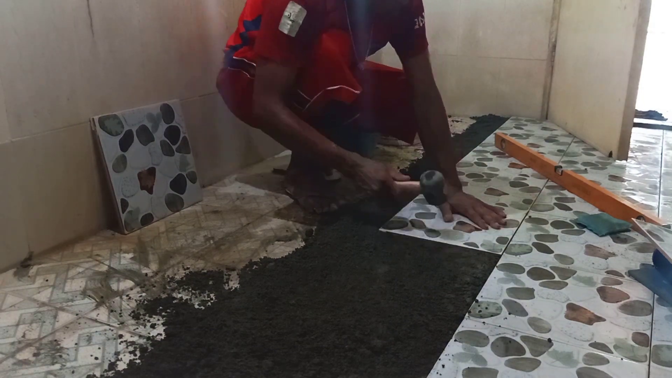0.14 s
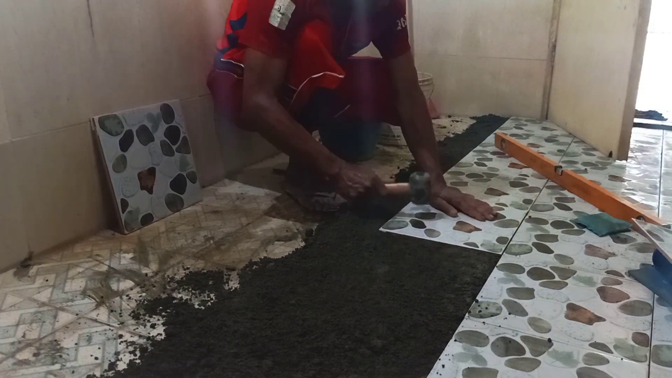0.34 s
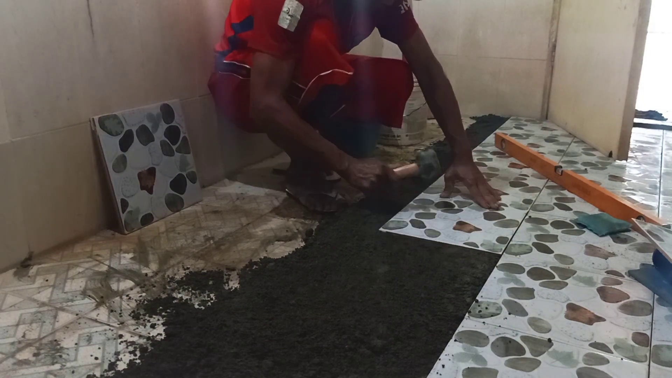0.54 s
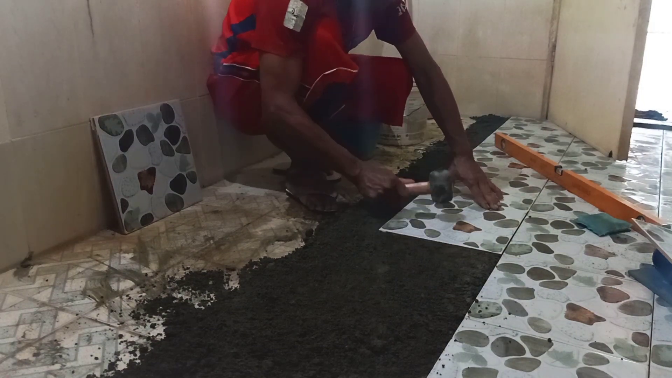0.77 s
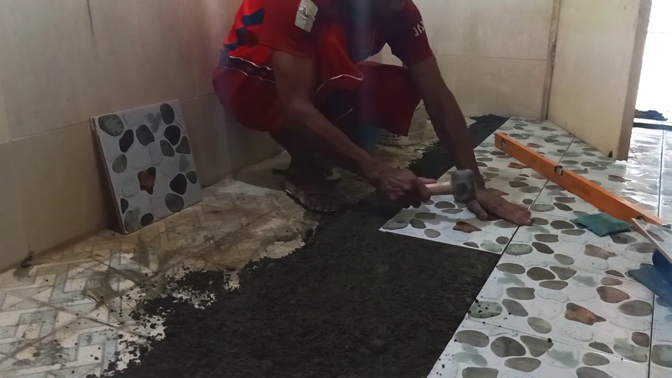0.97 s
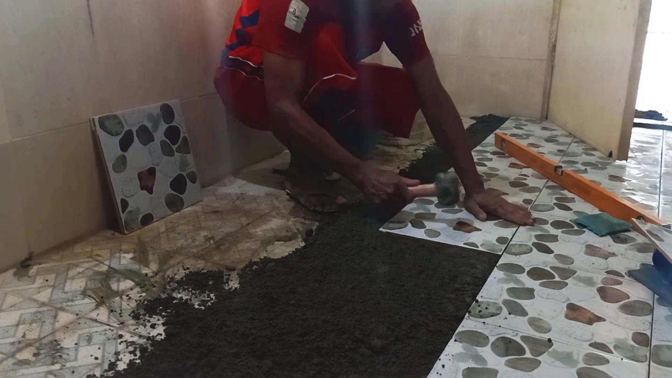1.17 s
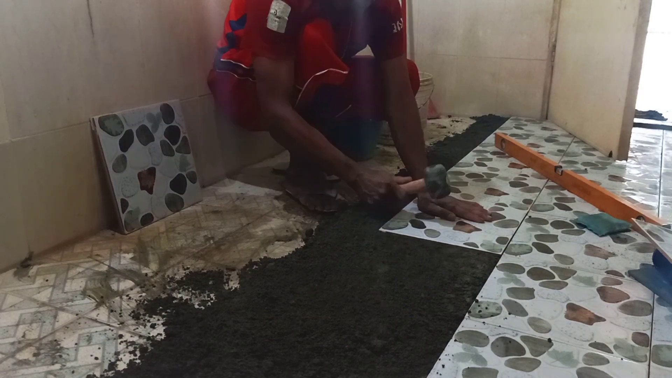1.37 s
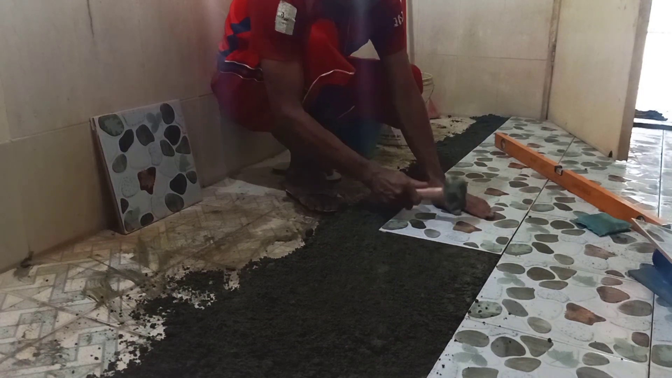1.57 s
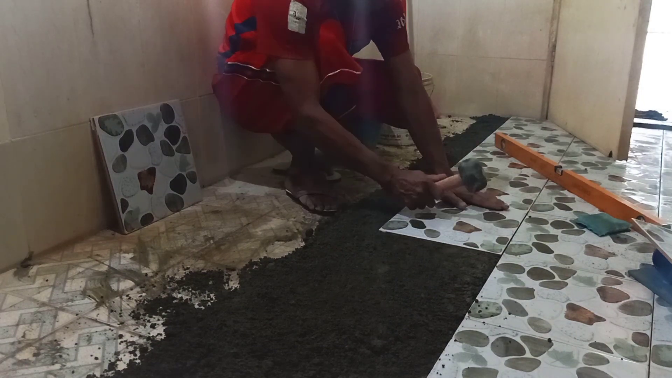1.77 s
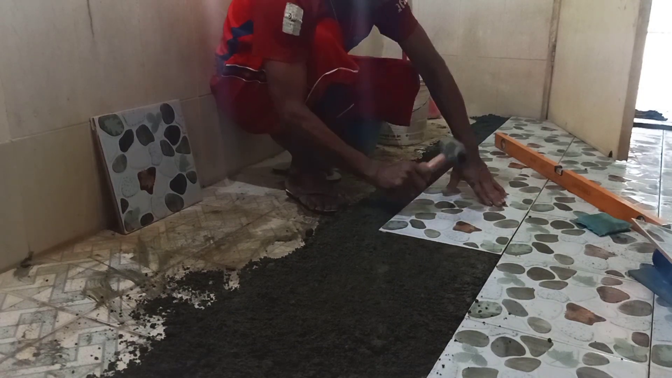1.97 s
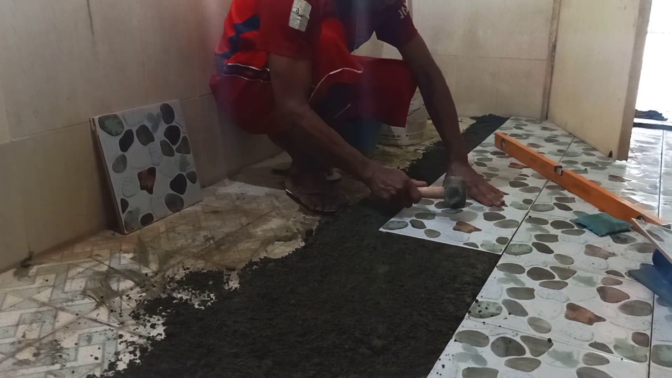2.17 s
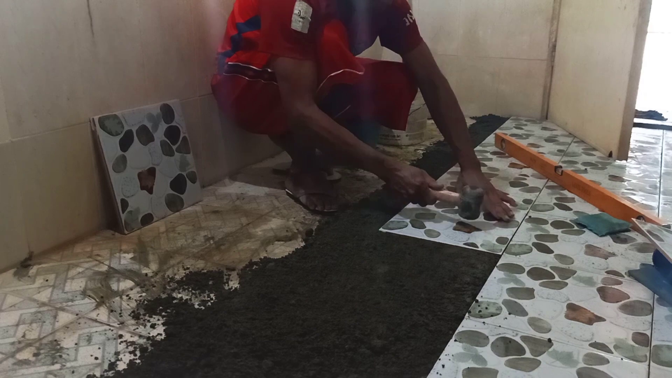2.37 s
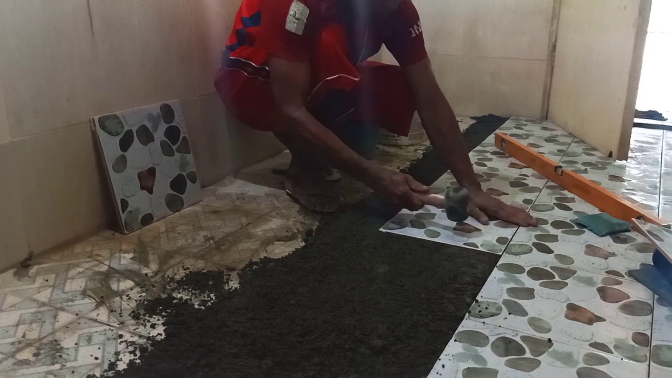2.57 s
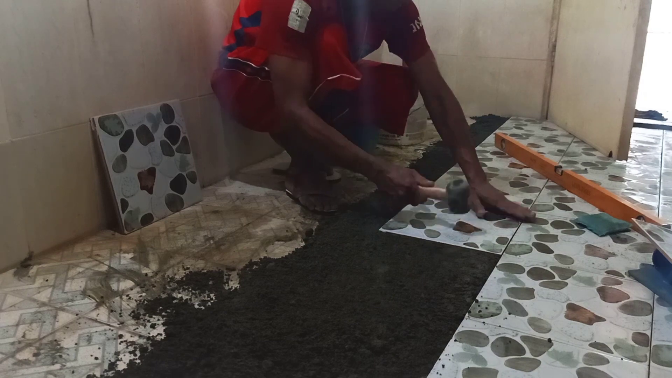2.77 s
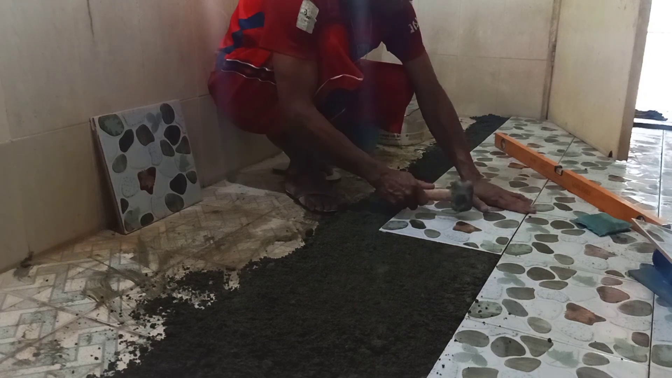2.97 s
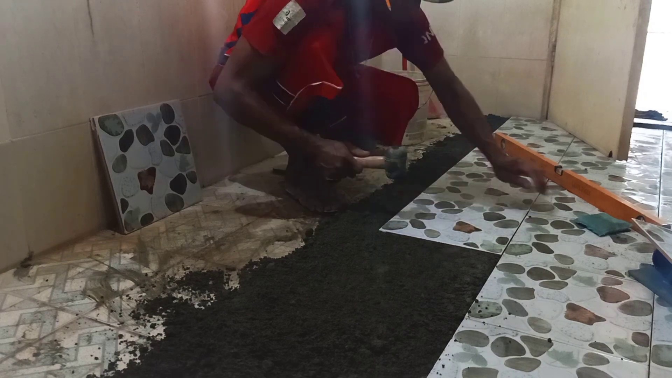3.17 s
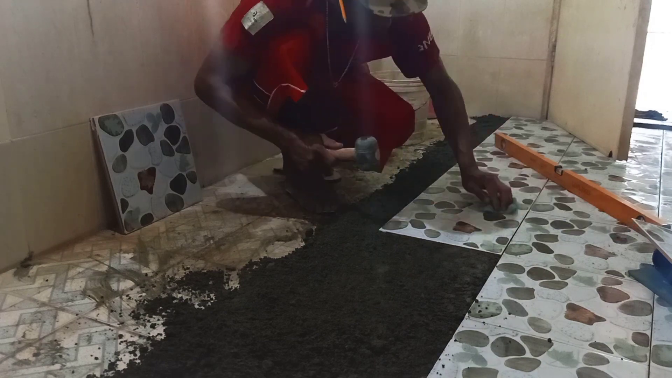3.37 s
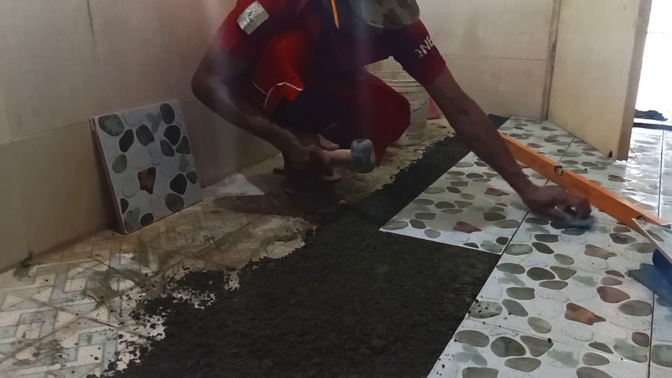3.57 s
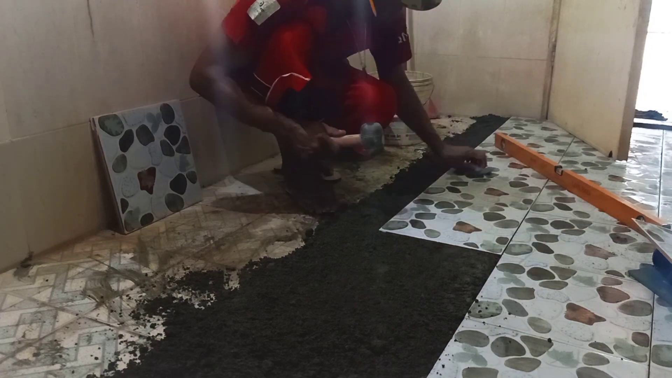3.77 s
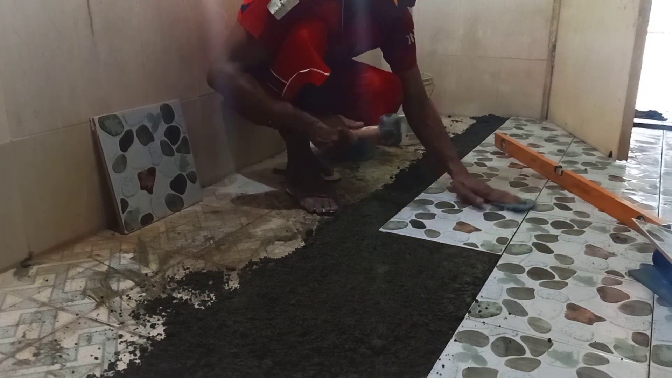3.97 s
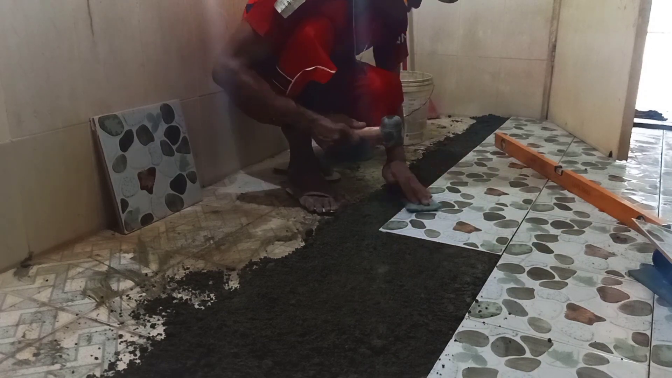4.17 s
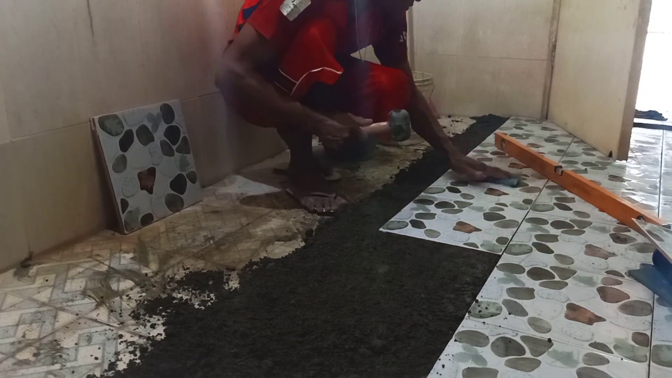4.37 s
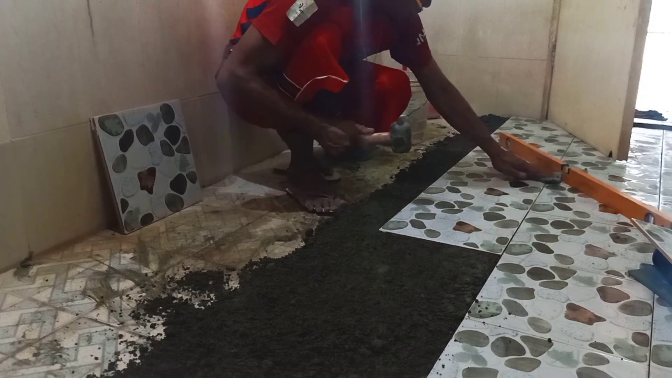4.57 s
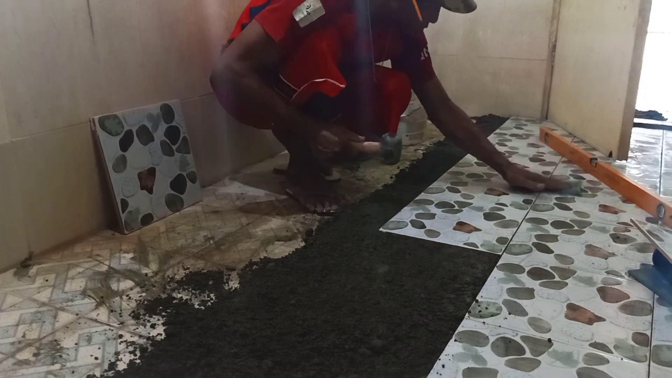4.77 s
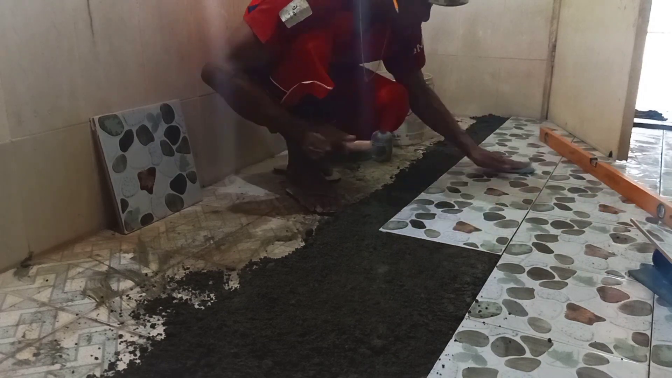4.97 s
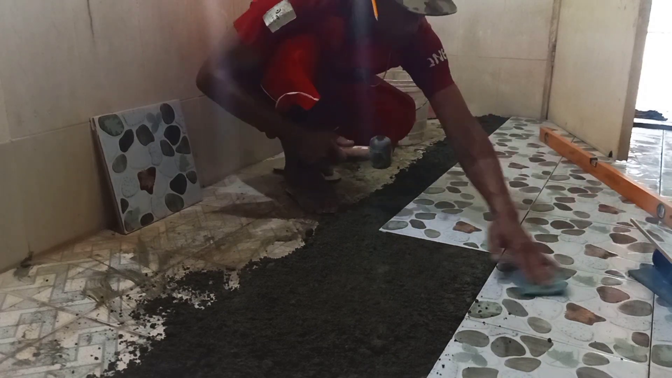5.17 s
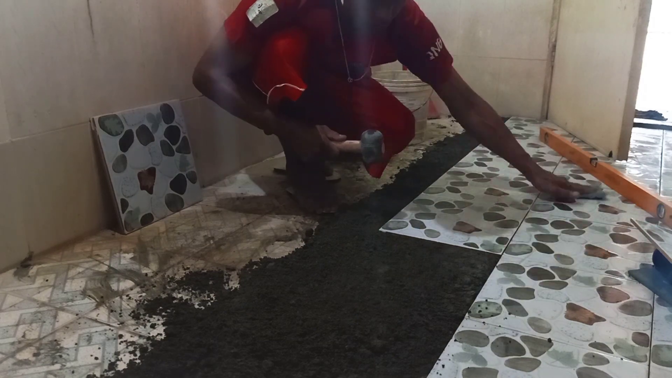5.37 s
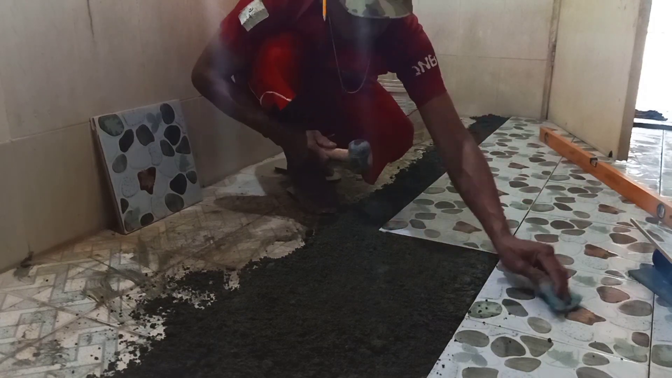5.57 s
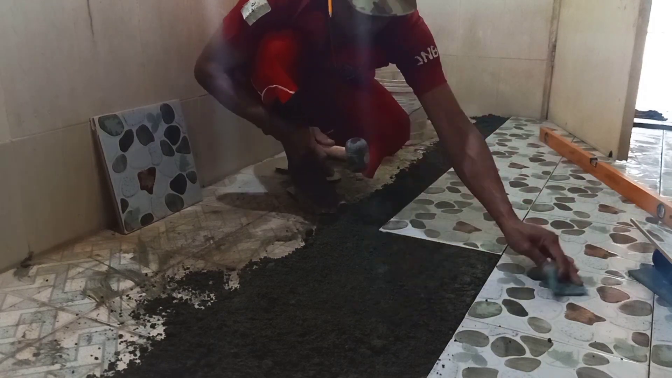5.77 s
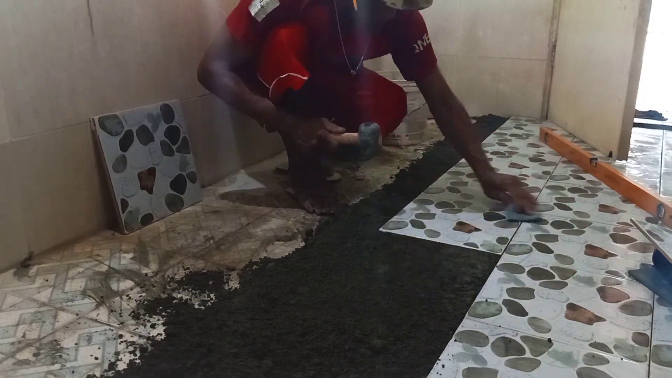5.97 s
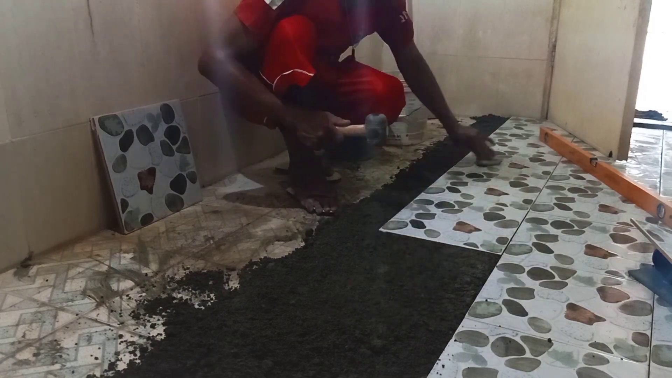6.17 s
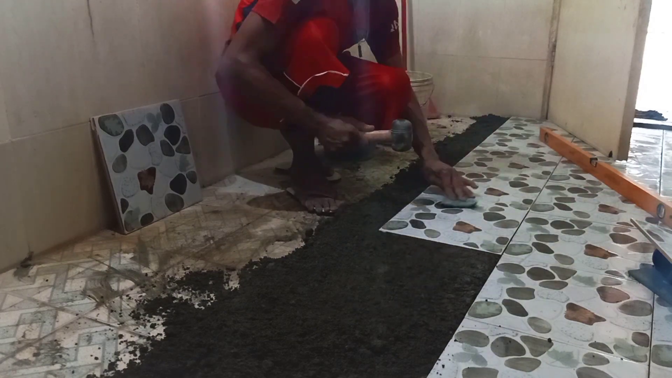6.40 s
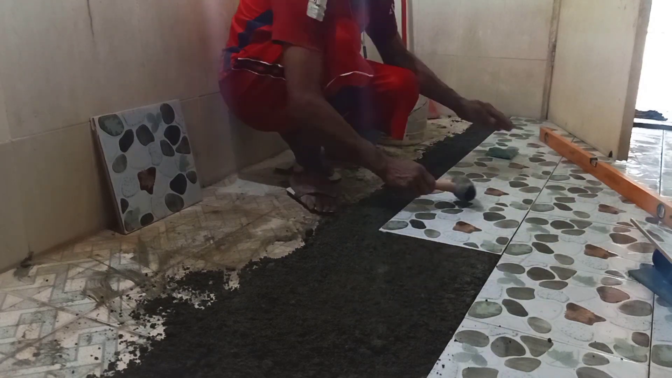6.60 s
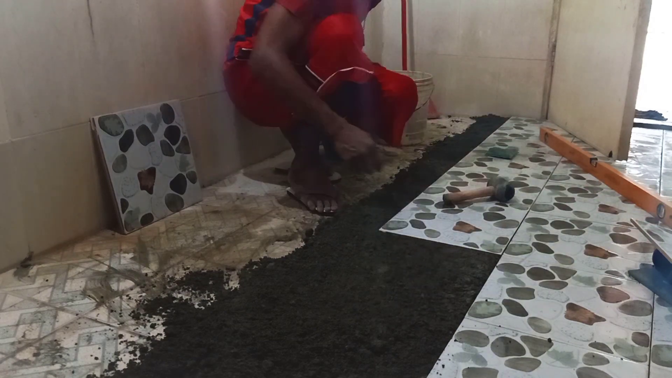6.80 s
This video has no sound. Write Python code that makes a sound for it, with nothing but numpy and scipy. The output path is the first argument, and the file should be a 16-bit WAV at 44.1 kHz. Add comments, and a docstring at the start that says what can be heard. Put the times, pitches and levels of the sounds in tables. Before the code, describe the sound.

In a small bare room, a rubber mallet beats a ceramic tile into wet mortar with fast, dull, slightly gritty thuds, about a dozen a second, for three seconds. The tapping stops and a sponge swishes softly over the tiles. A metal spirit level is shoved aside with a short ringing rasp, then light wiping and clothes rustle. Faint birds chirp outside. Close, slightly muffled microphone.

```python
"""In a small bare room, a rubber mallet beds a ceramic floor tile into fresh mortar: a fast run of dull taps.
Each tap mixes decaying sine tones of the tile with noise for its edge and for crushed sand.
Then a sponge wipes the tiles in strokes of tiny random slips, and clothes and feet rustle as filtered noise.
Amid the wiping, a metal spirit level is shoved aside: friction slips rasp and set its resonances ringing.
Faint falling chirps come in through the open door, over quiet, coloured noise for the air."""
import sys
import numpy as np
from scipy import signal
from scipy.fft import rfft, irfft
from scipy.io import wavfile
from scipy.ndimage import uniform_filter1d, minimum_filter1d

SR = 44100
rng = np.random.default_rng(int(sys.argv[2]) if len(sys.argv) > 2 else 0)


def put_to_file(sound):
    """Save the sound as 16-bit audio at rate SR, in the file named by the first command-line argument."""
    columns = np.atleast_2d(sound).T  # one column per channel
    safe = np.clip(columns, -1, 1)
    whole_steps = np.round(safe * 32767)
    wavfile.write(sys.argv[1], SR, whole_steps.astype(np.int16))


N = 301634   # length in samples

# Mallet taps: start_s, blur (0 = one crisp blow, 1 = a drawn-out burst), strength_db (relative),
# thud_tilt_db (per octave, 125 to 500 Hz), hollow_db (relative), extra_sand_db
MALLET_TAPS = [(0.013, 0.81, -24, 0.5, -8, 2), (0.106, 0.5, -22.5, 2, -7.5, 5.5),
               (0.19, 0.89, -32, -1, -15, 14), (0.368, 0.99, -21, 0.5, -11, 8),
               (0.459, 1, -23.5, 1.5, -18, 5.5), (0.5039, 0.51, -20, 0.5, -13, 3.5),
               (0.636, 0.55, -20, 1, -15.5, 5.5), (0.7217, 0.018, -22, 4, -20, 11.5),
               (0.77, 0.58, -20, -0.5, -15, 4), (0.902, 0.56, -21, -1, -16.5, -6),
               (0.945, 0.67, -23, -1, -8.5, 1.5), (1.108, 0.01, -21.5, -3, -18, 4.5),
               (1.163, 0.91, -23, -0.5, -13.5, -4), (1.205, 0.62, -24.5, -3, -14, -4),
               (1.296, 0.51, -20.5, 1.5, -11.5, -0.5), (1.323, 0.46, -27, 2.5, -10.5, -3),
               (1.385, 0.66, -23, 0.5, -16.5, -2), (1.472, 0.69, -20, -1, -7, 5.5),
               (1.564, 0.5, -22, 0, -11, 0), (1.645, 0, -17.5, 5, -19, 0),
               (1.7115, 0.42, -17.5, 1.5, -17.5, 1), (1.7994, 0.35, -18.5, -1, -18, 4),
               (1.874, 0.68, -22.5, -3.5, -7, 4.5), (1.96, 0.64, -23, -0.5, -9, 5),
               (2.0303, 0.068, -17, 5.5, -16.5, -2.5), (2.1771, 0, -21, 2.5, -13.5, -5),
               (2.243, 0, -15, -2.5, -23, -7.5), (2.309, 0.93, -25.5, -3, -16, -2.5),
               (2.4259, 0.35, -20, 0, -23, -7), (2.493, 0.66, -29, -0.5, -13.5, 16),
               (2.623, 0.53, -27.5, -5.5, -19, -9), (2.673, 0.51, -24.5, 1.5, -13, 6.5),
               (2.6822, 0.29, -23.5, -6, -13.5, -1), (2.751, 0.22, -43, -4, -14.5, -11),
               (2.812, 0.38, -31.5, 1, -16.5, 10.5), (2.884, 0.85, -33, 8, -10.5, -5),
               (3.063, 0.56, -23, -2, -17.5, -10), (3.111, 0.46, -19.5, 1.5, -13, -3),
               (3.183, 0, -35, -5, -20, -3), (6.786, 0.33, -48.5, -6, -21, 10)]
# The tile on its mortar bed, before each spot varies it: pitch_hz, level_db (relative), t60_s (time to fall 60 dB)
TILE_TONES = [(173.4, -16, 0.0434), (190, -8.85, 0.0202), (270, -11.6, 0.0172), (429.3, -23.2, 0.047)]
# The tile's higher bending tones, before each spot varies them: pitch_hz, level_db (relative), t60_s
KNOCK_TONES = [(832, 3, 0.027), (917, -0.5, 0.047), (995, -5, 0.053), (1153, -6, 0.016)]
# Hollow ring over a gap in the mortar, before each spot varies it: pitch_hz, level_db (relative), t60_s
HOLLOW_TONES = [(538, -0.5, 0.042), (620, -2.5, 0.05), (710, -4, 0.035)]
# Colour of the tile edge against its neighbour: frequency_hz, level_db (per Hz, relative)
EDGE_COLOUR = [(600, -15.5), (1100, 6), (1800, 0), (2600, -4), (3400, -14.5), (5000, -55.5)]
# Colour of sand crushed under the tile: frequency_hz, level_db (per Hz, relative)
SAND_COLOUR = [(2200, -19), (3400, -3), (4400, -0.5), (5700, 6), (6600, -7.5), (8000, -17.5),
               (10500, -24.5), (12000, -31)]
# A blow harder than usual is brighter: extra dB of knock and clack per dB of strength; sand adds clack too
USUAL_TAP_DB, KNOCK_GROWTH, CLACK_GROWTH, CLACK_PER_SAND = -24, 0.42, 0.45, 0.48
WALL_ECHO_S, WALL_ECHO_DB = .0087, -6.5


def mallet(thud_db, knock_db, clack_db, grit_db, room_db):
    """Each tap is a thud of the bedded tile, a higher knock, a hollow ring, an edge clack and a crunch of sand."""
    t, out = np.arange(SR // 3) / SR, np.zeros(N)
    span = np.sqrt(.043 * SR)   # spreads unit energy over a 43 ms tap body
    for start_s, blur, strength, tilt, hollow, sand in MALLET_TAPS:
        harder = strength - USUAL_TAP_DB
        thud = colour(tile_ring(t, TILE_TONES, contact_hz=426), [(125, 0), (500, 2 * tilt)])
        # the near wall throws the thud straight back
        wall_echo = np.interp(t - WALL_ECHO_S, t, thud, left=0)
        thud = energy_one(thud + from_db(WALL_ECHO_DB) * wall_echo)
        knock = tile_ring(t, KNOCK_TONES, contact_hz=1301)
        hollow_ring = tile_ring(t, HOLLOW_TONES, contact_hz=900)
        clack = colour(crunch(t, blur, crack_t60=0.02, settle_db=-14), EDGE_COLOUR)
        grit = colour(crunch(t, blur, crack_t60=0.014, settle_db=-15), SAND_COLOUR)

        tap = from_db(thud_db) * blurred(t, thud, blur)
        tap += from_db(knock_db + KNOCK_GROWTH * harder) * blurred(t, knock, blur)
        tap += from_db(hollow) * blurred(t, hollow_ring, blur)
        tap += from_db(clack_db + CLACK_GROWTH * harder + CLACK_PER_SAND * sand) * clack
        tap += from_db(grit_db + sand) * grit
        # every tap has its own echoes
        add(out, start_s, span * from_db(strength) * in_room(tap, room_db))
    return out


def tile_ring(t, modes, contact_hz):
    """The bedded tile rings after one blow; each spot has a slightly different pitch and mix."""
    hz, db, t60 = np.transpose(modes)[:, :, None]
    hz = hz * (1 + .04 * rng.standard_normal())
    db = db + .6 * rng.standard_normal(db.shape)
    signs = -(-1) ** np.arange(len(modes))[:, None]   # neighbouring tones start in opposite directions
    ring = np.sum(signs * from_db(db - 60 * t / t60) * np.sin(2 * np.pi * hz * t), axis=0)
    # so small a plate radiates little bass, and the soft rubber head leaves the treble weak
    band = signal.butter(2, [105, contact_hz], "band", fs=SR, output="sos")
    return energy_one(signal.sosfilt(band, ring))


def noise_burst(t, length_s, after_db, size=2048):
    """An even burst of noise, about 45 ms long, drops to a weaker one; unit energy."""
    pieces = []
    for _ in range(len(t) // size + 1):
        random_phase = 2 * np.pi * rng.random(size // 2 + 1)
        pieces.append(irfft(np.exp(1j * random_phase)))   # every frequency equally strong
    after = from_db(after_db)
    fade = np.interp(t / length_s, [0, .04, .92, 1.1, 1.9, 2.2], [.5, 1, 1, after, after, 0])
    return energy_one(np.concatenate(pieces)[:len(t)] * fade)


def blurred(t, ring, blur):
    """Cross-fade from one crisp ring to the same ring drawn out by a noise burst; unit energy."""
    burst = noise_burst(t, length_s=0.0426, after_db=-16.5)
    drawn_out = energy_one(signal.fftconvolve(burst, ring)[:len(t)])
    return energy_one((1 - blur) ** 2 * ring + blur ** 2 * drawn_out)


def crunch(t, blur, crack_t60, settle_db):
    """A sharp crack with sand settling after it cross-fades to a drawn-out noise burst; unit energy."""
    fade = from_db(-60 * t / crack_t60) + from_db(settle_db - 60 * t / 0.3)
    crack = energy_one(rng.standard_normal(len(t)) * fade)
    burst = noise_burst(t, length_s=0.04, after_db=-25.5)
    return energy_one((1 - blur) * crack + blur * burst)


def low_pulse(pulse_db, length_s):
    """A faint, smooth low pulse under each tap."""
    out, pulse = np.zeros(N), np.hanning(int(length_s * SR))
    for start_s, _, strength, *_ in MALLET_TAPS:
        add(out, start_s, from_db(strength + pulse_db) * pulse)
    return out


# Friction as the level slides over the tiles: time_s, level_db (relative)
SLIDE_LEVEL = [(4.65, -62.5), (4.694, -50.5), (4.706, -31), (4.794, -34), (4.81, -29), (4.829, -31),
               (4.836, -38), (4.872, -37.5), (4.885, -57), (4.92, -52), (4.958, -71), (4.98, -80)]
# Its low groan: time_s, level_db
GROAN_LEVEL = [(4.703, -59), (4.712, -40.5), (4.735, -48), (4.8, -47.5), (4.865, -43), (4.9, -49),
               (4.915, -63)]
# Resonances of the metal bar: pitch_hz, width_hz, level_db (relative)
BAR_TONES = [(343, 18, 15), (1140, 50, -1), (1130, 43, -4), (1550, 16, 0), (1590, 16, -16), (1735, 18, 8),
             (1720, 28, 5), (2205, 36, 4), (2400, 25, 2), (4830, 16, -1), (5587, 22, -8), (8500, 120, -8)]
# Colour of its rasp: frequency_hz, level_db (per Hz, relative)
RASP_COLOUR = [(40, -29), (100, -1), (200, 2.5), (400, 5), (650, 2), (1100, 7), (1800, 8.5), (2500, 7),
               (3400, -6.5), (4500, 2.5), (5600, 10.5), (7300, -0.5), (8800, -0.5), (11000, -10),
               (12000, -30)]
SHIFT_DB, SHIFTS_PER_S = 4.5, 40   # how far and how fast each resonance swells and sinks


def spirit_level(ring_db, rasp_db, groan_hz, groan_q):
    """Stick-slip on gritty tile rasps and rings the hollow bar; resonances come and go as the contact shifts."""
    friction = slips(per_s=3200, spread_db=1.5) * gains_in_time(SLIDE_LEVEL)[0]
    t = np.arange(SR // 4) / SR
    modes = []
    for hz, width, db in BAR_TONES:
        decay = np.exp(-np.pi * width * t)
        modes.append(from_db(db) * width * decay * np.sin(2 * np.pi * hz * t))
    modes = np.array(modes)
    bar = np.zeros(N)
    for mode in modes / np.linalg.norm(modes):
        shifting = friction * from_db(SHIFT_DB * drift(rate=SHIFTS_PER_S))
        bar += signal.oaconvolve(shifting, mode)[:N]

    # the same resonance twice gives the groan a more definite pitch
    resonance = signal.iirpeak(groan_hz, groan_q, fs=SR)
    judder = signal.lfilter(*resonance, slips(per_s=600, spread_db=-1.5))
    groan = gains_in_time(GROAN_LEVEL)[0] * rms_one(signal.lfilter(*resonance, judder))
    return from_db(ring_db) * bar + from_db(rasp_db) * colour(friction, RASP_COLOUR) + groan


# Sponge strokes: start_s, length_s, swish_db (relative), wet_glaze_hiss_db (relative)
SPONGE_STROKES = [(3.19, 0.036, -67, -70), (3.28, 0.048, -63.5, -82), (3.43, 0.098, -64, -69.5),
                  (3.68, 0.074, -67.5, -66.5), (3.89, 0.028, -53, -66), (4.12, 0.071, -59.5, -70),
                  (4.57, 0.089, -68, -79), (5.05, 0.049, -77, -75), (5.17, 0.21, -65, -73),
                  (5.48, 0.078, -61.5, -73.5), (5.71, 0.052, -51, -65), (5.91, 0.11, -53, -90),
                  (6.12, 0.13, -61.5, -86), (6.28, 0.15, -55, -72.5), (6.46, 0.26, -59.5, -84),
                  (6.76, 0.045, -55, -75)]
# Clothes and feet shifting: start_s, length_s, level_db (relative)
BODY_SHIFTS = [(5.74, 0.044, -59), (5.93, 0.11, -59), (6.1, 0.87, -56), (6.5, 0.076, -55),
               (6.775, .06, -53)]
# Sand grains cracking on the glaze: start_s, level_db (relative)
SAND_CRACKS = [(2.23, -43), (3.905, -59), (5.2483, -42.5), (5.7194, -41), (6.39, -41)]
# Colour of the sponge: frequency_hz, level_db (per Hz, relative)
SPONGE_COLOUR = [(700, -48.5), (1300, 0.5), (2100, 8.5), (3600, -2.5), (5600, 1.5), (7000, -11.5),
                 (10000, -37.5), (12000, -31.5)]
# Colour of the clothes: frequency_hz, level_db (per Hz, relative)
CLOTHES_COLOUR = [(60, -1), (140, 12.5), (320, 13), (600, 8), (1200, 6), (2500, -66)]


def wiping(swish_db, hiss_db, hiss_hz, rustle_db, grain_db, grain_t60):
    """The sponge swishes over the glaze and catches sand; clothes and feet rustle lower down."""
    pressure, wetness = strokes(SPONGE_STROKES)
    rub = from_db(swish_db + 2 * drift(rate=30)) * pressure * slips(per_s=2000, spread_db=1.5)
    t = np.arange(SR // 20) / SR
    for start_s, db in SAND_CRACKS:
        fade = from_db(db + grain_db - 60 * t / grain_t60)
        add(rub, start_s, fade * rng.standard_normal(len(t)))

    glaze = signal.butter(2, [hiss_hz, 1.6 * hiss_hz], "band", fs=SR, output="sos")
    wet_slips = rms_one(signal.sosfilt(glaze, slips(per_s=2700, spread_db=2.0)))
    hiss = from_db(hiss_db) * wetness * wet_slips

    movement = strokes(BODY_SHIFTS)[0]
    rustle = from_db(rustle_db + 2 * drift(rate=28)) * movement * rng.standard_normal(N)
    return colour(rub, SPONGE_COLOUR) + hiss + colour(rustle, CLOTHES_COLOUR)


SWELL_S, FADE_S = 0.026, 0.059   # every stroke of the hand or shift of the body


def strokes(rows):
    """Rows of (start_s, length_s, level_db, ..) become gain curves: each stroke swells, holds and fades."""
    t = np.arange(N) / SR
    shapes = []
    for start_s, length, *_ in rows:
        swell = np.interp(t - start_s, [0, SWELL_S], [0, 1])
        fade = np.interp(t - start_s - length, [0, FADE_S], [1, 0])
        shapes.append(swell * fade)
    return from_db(np.array(rows)[:, 2:].T) @ np.array(shapes)


# Faint low tones of rubbing: start_s, length_s, first_pitch_hz, last_pitch_hz, level_db (before wavering)
RUB_TONES = [(5.43, 0.14, 660, 571, -61.5), (5.95, 0.11, 309, 296, -58), (6.02, 0.12, 506, 442, -60),
             (6.36, 0.096, 203, 235, -55)]


def rubs(waver):
    """Now and then a rub settles into a faint low tone, unsteady in pitch and level."""
    out = np.zeros(N)
    for start_s, length, from_hz, to_hz, db in RUB_TONES:
        u = np.linspace(0, 1, int(length * SR))
        hz = (from_hz + (to_hz - from_hz) * u) * (1 + waver * drift(rate=143)[:len(u)])
        level = from_db(db + 2 * drift(rate=63)[:len(u)]) * np.sin(np.pi * u)
        add(out, start_s, level * np.sin(2 * np.pi * np.cumsum(hz) / SR))
    return out


# Birds outside: start_s, middle_pitch_hz (before wavering), level_db (before smearing)
BIRD_CHIRPS = [(0.28, 5330, -54), (1.02, 5460, -78), (1.13, 5070, -61), (1.239, 5180, -68),
               (1.6, 4920, -63.5), (2.04, 5140, -63), (2.13, 4910, -65), (2.279, 5400, -66),
               (2.39, 5670, -63), (2.781, 5410, -60), (2.909, 5180, -55.5), (3.01, 5550, -58.5),
               (3.119, 5380, -63), (3.25, 5780, -59.5), (3.361, 5780, -58), (3.38, 5200, -61),
               (3.5, 5240, -56), (3.631, 5000, -66), (3.76, 5400, -57.5), (3.811, 4800, -60),
               (3.89, 5670, -62), (4.18, 5020, -59), (4.3, 5550, -62.5), (4.42, 5570, -56),
               (4.569, 5600, -62.5), (4.91, 5600, -55.5), (5.04, 5270, -57), (5.17, 5400, -58),
               (5.32, 5490, -56), (5.45, 5780, -53), (5.57, 5620, -54.5), (5.84, 5600, -58),
               (6.06, 5480, -56), (6.281, 5780, -56), (6.48, 5540, -58.5), (6.59, 5600, -59.5),
               (6.63, 5140, -60), (6.739, 5630, -56)]


def chirps(fall_hz, length_s, waver_hz):
    """Small far birds: short, hoarse, falling chirps, smeared by the walls on their way in."""
    out, u = np.zeros(N), np.linspace(0, 1, int(length_s * SR))
    for start_s, pitch_hz, db in BIRD_CHIRPS:
        waver = np.interp(u, np.linspace(0, 1, 80), rng.standard_normal(80))
        hz = pitch_hz + fall_hz * (.5 - u) + waver_hz * waver
        add(out, start_s, from_db(db) * np.sin(np.pi * u) * np.sin(2 * np.pi * np.cumsum(hz) / SR))
    t = np.arange(SR // 5) / SR
    smear = energy_one(rng.standard_normal(len(t)) * from_db(-60 * t / 0.098))
    return signal.fftconvolve(out, smear)[:N]


# Colour of still air and far hiss from outdoors: frequency_hz, level_db (per Hz, relative)
AIR_COLOUR = [(25, -19), (50, -15), (120, -3.5), (210, -16), (300, -11), (500, -17), (1400, -25),
              (2150, -21), (3500, -27), (5550, -19), (6800, -36.5), (10500, -44.5), (12000, -58.5)]


def quiet_air(level_db):
    """Steady random noise, coloured like still air and far outdoor hiss."""
    return from_db(level_db) * colour(rng.standard_normal(N), AIR_COLOUR)


ROOM_T60_S, BASS_T60_S, BASS_HZ = .31, .45, 260
BOOM_HZ, BOOM_DB = 430, -10


def in_room(x, room_db):
    """Add the dense echoes of bare walls; the bass lasts longest and the low middle booms."""
    t = np.arange(SR // 3) / SR
    echoes = rng.standard_normal(len(t))
    bass = signal.sosfiltfilt(signal.butter(2, BASS_HZ, fs=SR, output="sos"), echoes)
    tail = bass * from_db(-60 * t / BASS_T60_S) + (echoes - bass) * from_db(-60 * t / ROOM_T60_S)
    tail = energy_one(tail * np.clip(t / WALL_ECHO_S - 1, 0, 1))   # silent until the wall echo, then fades in
    tail = tail + from_db(BOOM_DB) * signal.lfilter(*signal.iirpeak(BOOM_HZ, 1, fs=SR), tail)
    return x + from_db(room_db) * signal.fftconvolve(x, tail)[:len(x)]


def slips(per_s, spread_db):
    """Random tiny slips of uneven size; rms 1."""
    sizes = from_db(spread_db * np.minimum(rng.exponential(1, N), 4))
    signed_sizes = sizes * rng.choice([-1, 1], N)
    return rms_one(signed_sizes * (rng.random(N) < per_s / SR))


def drift(rate):
    """A random wander through `rate` new values a second; rms 1."""
    knots = rng.standard_normal(2048)
    return rms_one(np.interp(np.arange(N) / SR * rate, np.arange(len(knots)), knots))


def colour(x, spectrum, size=2048):
    """Filter with the given spectrum, unit energy and no sound ahead of its cause (minimum phase)."""
    hz = np.arange(size // 2 + 1) * SR / size
    cepstrum = irfft(np.log(from_db(at_hz(spectrum, hz))))
    # folding the second half onto the first puts the response as early as possible
    cepstrum[1:size // 2] *= 2
    cepstrum[size // 2 + 1:] = 0
    response = energy_one(irfft(np.exp(rfft(cepstrum))))
    return signal.fftconvolve(x, response)[:len(x)]


def at_hz(points, hz):
    """Read a table on a log-frequency axis."""
    f, value = np.transpose(points)
    return np.interp(np.log(np.maximum(hz, 1)), np.log(f), value)


def gains_in_time(rows):
    """Rows of (time_s, level_db, ..) become gain curves, silent outside their span."""
    time_s, *columns = np.transpose(rows)
    t = np.arange(N) / SR
    return [from_db(np.interp(t, time_s, db, left=-np.inf, right=-np.inf)) for db in columns]


def add(out, start_s, sound):
    """Mix a sound in at its start time."""
    at = max(round(start_s * SR), 0)
    out[at:at + len(sound)] += sound[:max(N - at, 0)]


def from_db(db):
    """Decibels to gain."""
    return 10 ** (np.asarray(db) / 20)


def rms_one(x):
    """Scale to rms 1."""
    return x / np.sqrt(np.mean(x ** 2) + 1e-20)


def energy_one(x):
    """Scale to unit energy."""
    return x / np.sqrt(np.sum(x ** 2) + 1e-20)


def limiter(x, ceiling_db, release_db_per_s):
    """The gain dips around peaks above the ceiling and recovers quickly."""
    over = np.maximum(20 * np.log10(np.abs(x) + 1e-9) - ceiling_db, 0)
    ramp = release_db_per_s * np.arange(N) / SR
    gain_db = ramp - np.maximum.accumulate(over + ramp, axis=-1)
    # widen each dip, then round its edges
    return x * from_db(uniform_filter1d(minimum_filter1d(gain_db, size=131), size=131))


def scene():
    """Tapping, scraping and wiping in the room, over quiet air and birds."""
    taps = mallet(thud_db=1.0, knock_db=-21.0, clack_db=-27.5, grit_db=-39.5, room_db=-9)
    lows = low_pulse(pulse_db=-12.0, length_s=0.0042)
    scrape = spirit_level(ring_db=-12.0, rasp_db=-2.0, groan_hz=368, groan_q=1.8)
    sponge = wiping(swish_db=-1.5, hiss_db=-1.0, hiss_hz=5280, rustle_db=-2.5, grain_db=-5, grain_t60=0.022)
    handling = in_room(scrape + rubs(waver=.04) + sponge, room_db=-14)
    birds = chirps(fall_hz=250, length_s=0.06, waver_hz=220)
    return (taps + lows + handling + birds + quiet_air(level_db=-59.5))[None]


def record(dry):
    """The microphone sheds the deepest bass, loud peaks are limited, the top is cut."""
    thin = signal.sosfilt(signal.butter(2, 42, "high", fs=SR, output="sos"), dry)
    held = limiter(thin, ceiling_db=-4.5, release_db_per_s=400)
    top_cut = signal.ellip(10, .3, 80, 11900, fs=SR, output="sos")   # steep cut above 11900 Hz
    return signal.sosfilt(top_cut, held)


dry = scene()
out = record(dry)
put_to_file(out)
```